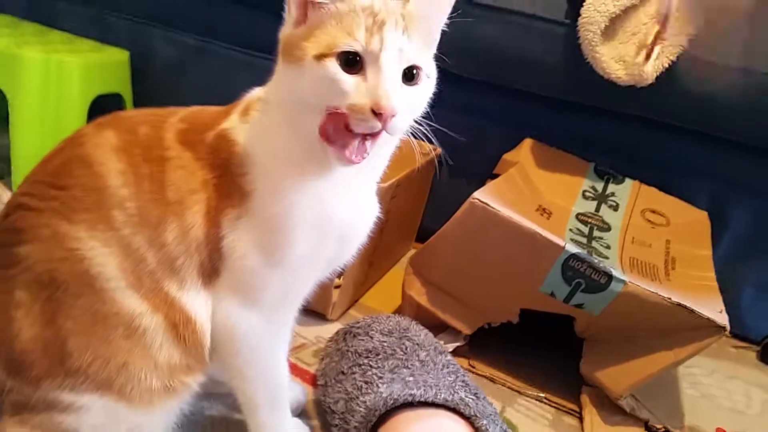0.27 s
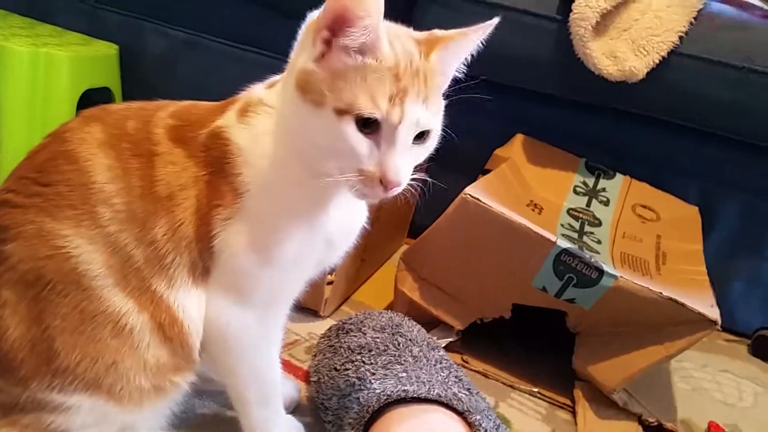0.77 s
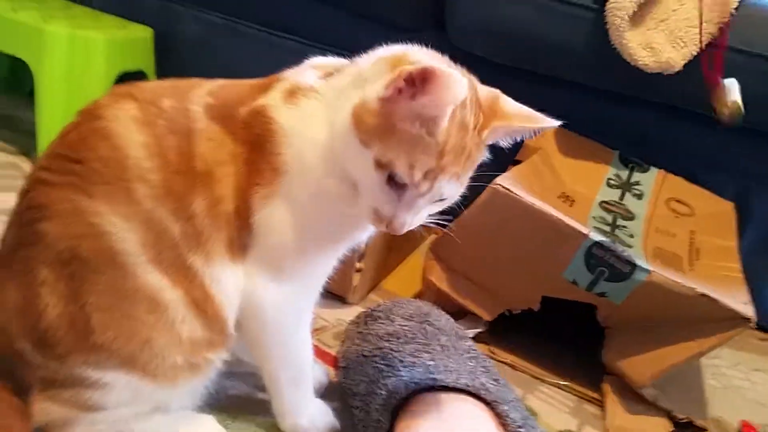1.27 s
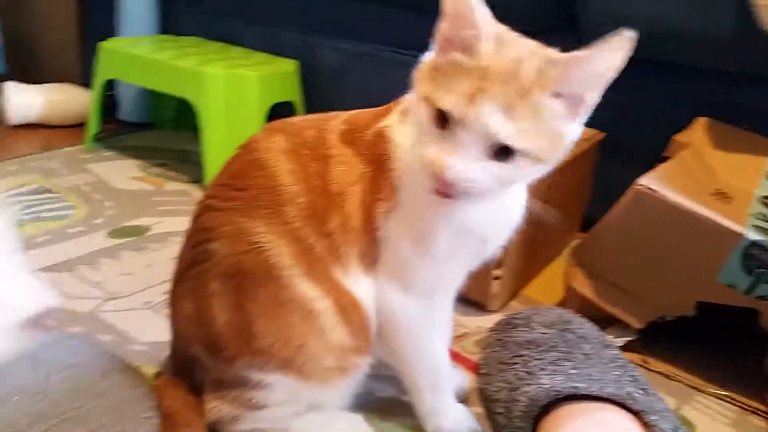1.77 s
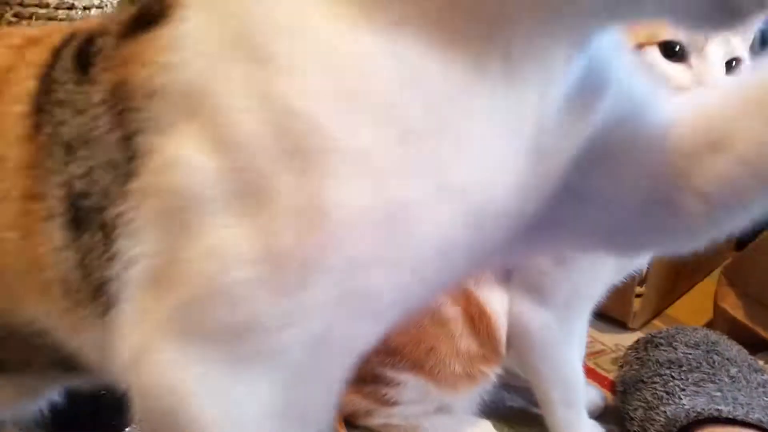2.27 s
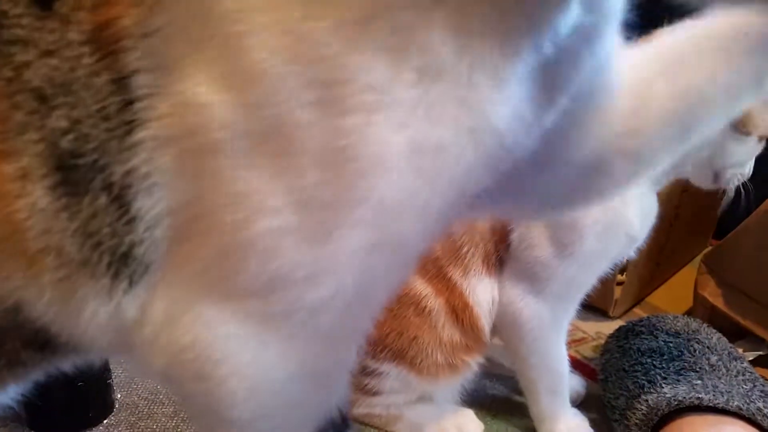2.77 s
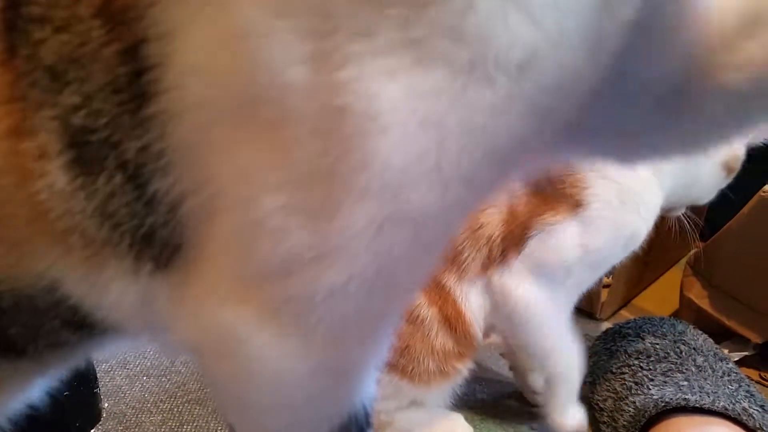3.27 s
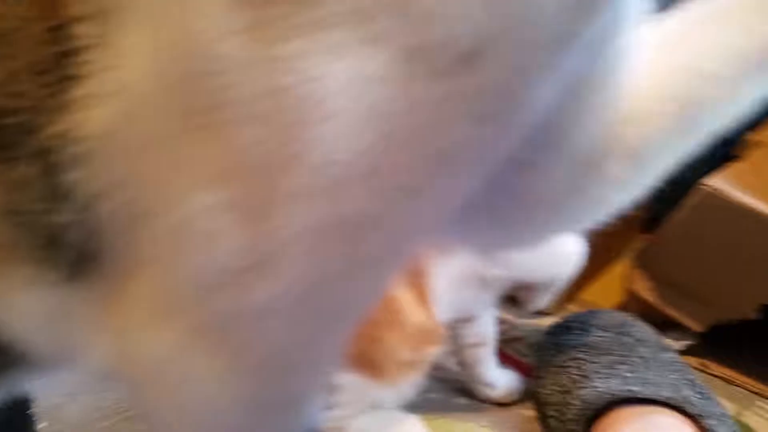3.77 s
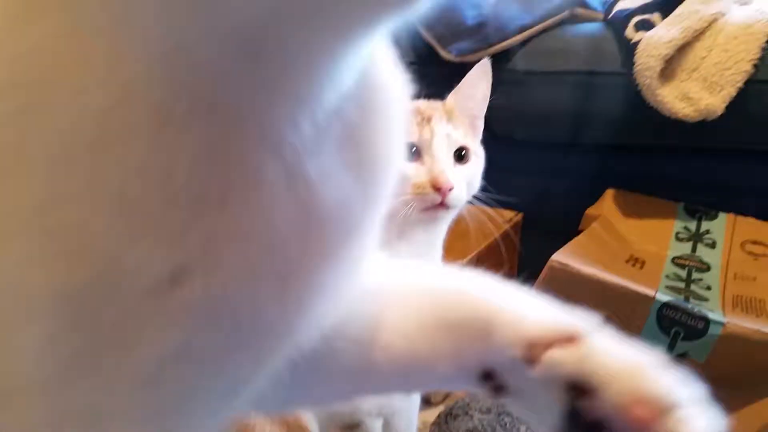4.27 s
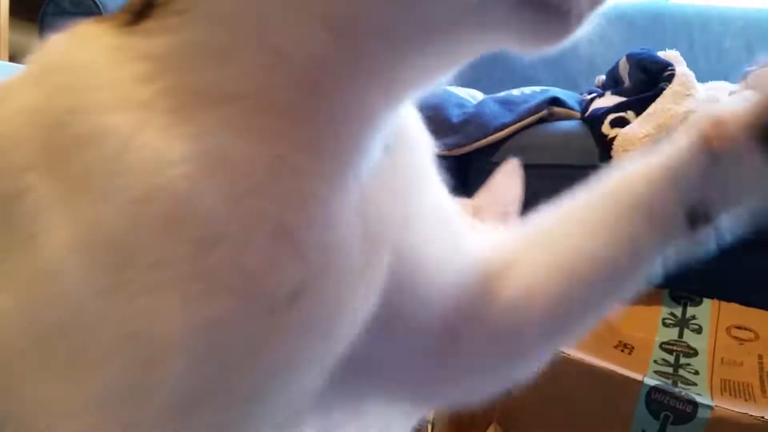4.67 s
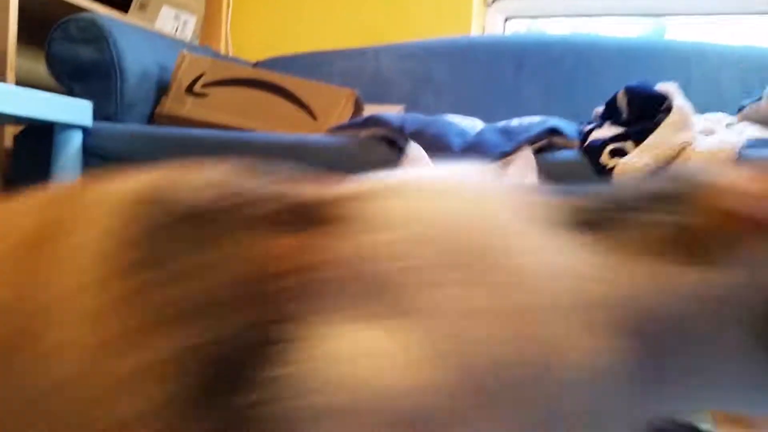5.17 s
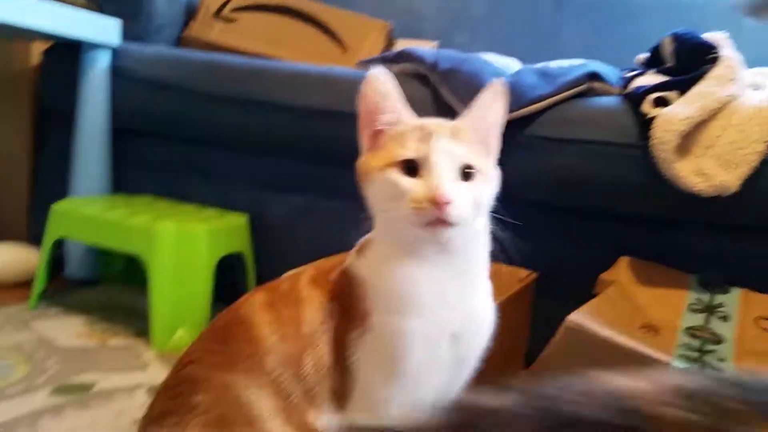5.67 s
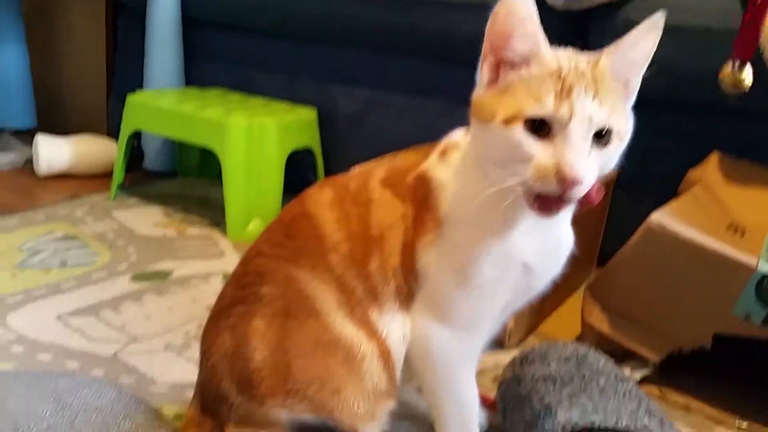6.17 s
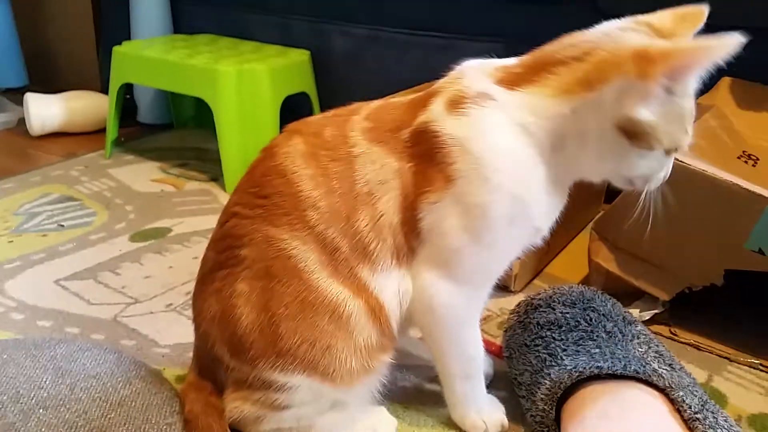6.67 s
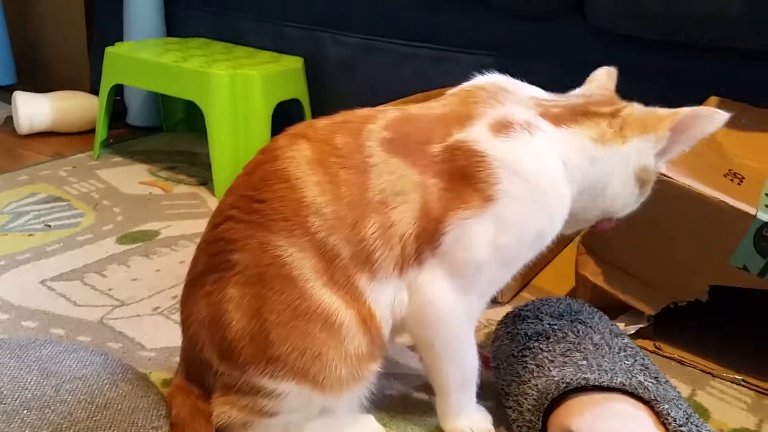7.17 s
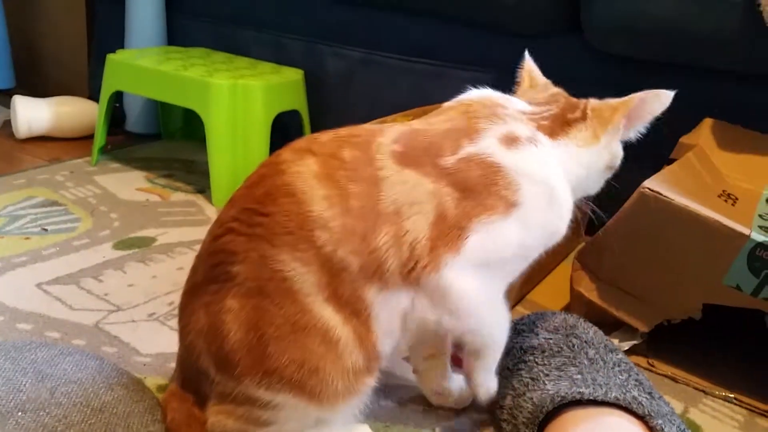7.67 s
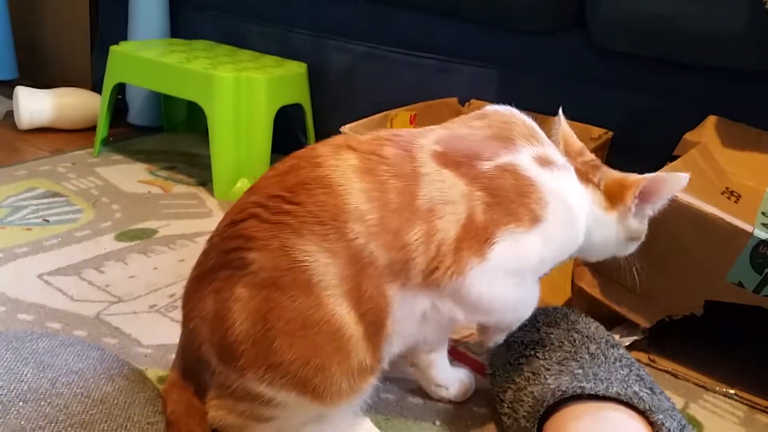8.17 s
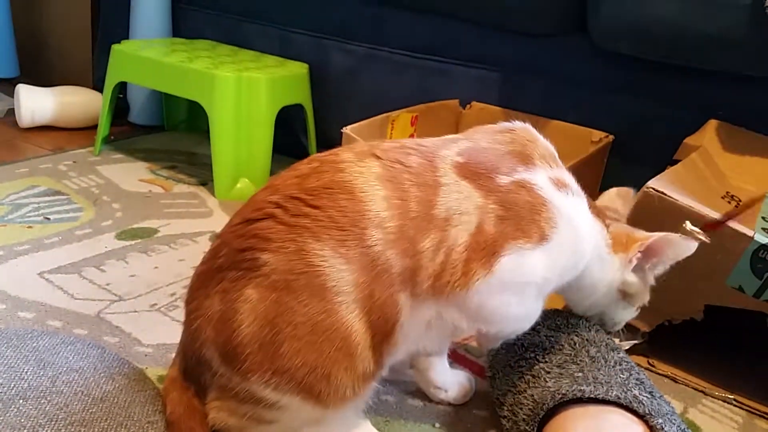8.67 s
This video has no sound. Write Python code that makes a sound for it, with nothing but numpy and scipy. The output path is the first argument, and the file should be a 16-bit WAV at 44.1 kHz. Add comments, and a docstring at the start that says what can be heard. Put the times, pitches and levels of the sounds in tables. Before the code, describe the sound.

Indoors, close to a phone microphone, a little bell tinkles and rattles as cats play with it. Light jingles come first, then a vigorous flurry, a gap with handling bumps and one heavy knock at about five seconds, scattered tinkles, and renewed jingling to the end. The bell sits right; dull finger knocks, rubs and low paw thuds sit left. Quiet background hiss rises and sinks beneath, with a short room echo.

```python
"""A small sleigh bell on a cat toy jingles to the right of a hand-held phone: its loose pellet strikes, stops and
restarts damped shell modes, with noise clicks. The holding hand covers the left microphone, which hears the bell
more faintly but knocks (damped case modes) and rubs (resonant noise patter) loudly. Paws thump as slow pushes
with a rumble, a few dry taps sound on the right, and a quiet background hiss, coloured differently left and
right, swells and sinks."""
import sys
import numpy as np
from scipy import signal
from scipy.fft import rfft, irfft, next_fast_len
from scipy.io import wavfile
from scipy.ndimage import uniform_filter1d, map_coordinates

SR = 44100
rng = np.random.default_rng(int(sys.argv[2]) if len(sys.argv) > 2 else 0)


def master_out(mix):
    """Clip the mix to full scale and print it as 16-bit PCM to the path in sys.argv[1]."""
    frames = np.transpose(np.atleast_2d(mix))
    ceiling = np.clip(frames, -1, 1)
    pcm = np.round(ceiling * 32767).astype(np.int16)
    wavfile.write(sys.argv[1], SR, pcm)


N = 393372  # length in samples


def amp(db):
    """Amplitude factor of a level in dB."""
    return 10 ** (np.asarray(db, float) / 20)


def unit(x):
    """x scaled to an RMS of 1."""
    return x / np.sqrt(np.mean(x ** 2, -1, keepdims=True))


def curve(rows):
    """A level in dB for every sample, -120 dB outside the rows."""
    s, db = np.transpose(rows)
    return np.interp(np.arange(N) / SR, s, db, left=-120, right=-120)


def wobble(rate_hz):
    """A smooth random curve, rate_hz knots a second."""
    knots = rng.standard_normal(int(N * rate_hz / SR) + 4)
    return map_coordinates(knots, [np.arange(N) * rate_hz / SR])


def filtered(x, response):
    """x times a complex response of frequency in Hz."""
    m = next_fast_len(N + SR // 2)
    return irfft(rfft(x, m) * response(np.fft.rfftfreq(m, 1 / SR)), m)[..., :N]


def peaks(rows):
    """Causal response of (Hz, width Hz, dB) resonances, alternating in sign."""
    def response(f):
        return sum((-1) ** k * amp(db) * 1j * f * width / (hz * hz - f * f + 1j * f * width)
                   for k, (hz, width, db) in enumerate(rows))
    return response


def add(track, s, sound):
    """Mixes a sound into the track at s seconds."""
    part = track[..., max(round(s * SR), 0):][..., :sound.shape[-1]]
    part += sound[..., :part.shape[-1]]


# Background swell in the middle band. Each row: time in seconds, level in dB.
SWELL = [(0, 0.5), (.95, -5.5), (1.35, 7), (2.4, 10.5), (2.75, 6.5), (3.2, 6.5), (3.85, 2.5), (4.8, 3),
         (5.3, 11), (5.7, 6.5), (6.1, 8), (6.9, 2), (7.3, 8.5), (7.9, 4), (8.4, 4.5), (8.92, 8)]
# Background colour. Each row: frequency in Hz, left level in dB, right level in dB.
HISS_COLOUR = [(25, -92, -94), (68.8, -87.5, -88), (400, -95.5, -97), (567, -99, -101), (1020, -92.5, -104),
               (1263, -99.5, -108), (1674, -118, -120), (2510, -113, -119), (2740, -127, -126),
               (4275, -102, -115), (4950, -119, -123), (5900, -131, -134), (8500, -134, -137),
               (13060, -122, -126)]


def background():
    """A quiet hiss, coloured differently left and right, swells and sinks; the bass is partly shared."""
    hz, *sides_db = np.transpose(HISS_COLOUR)
    shared, own = rng.standard_normal(N), rng.standard_normal((2, N))

    def colour(f):
        return amp([np.interp(np.log(f + 1), np.log(hz), db) for db in sides_db]) * np.sqrt(SR / 2)

    shared_bass = filtered(shared, lambda f: 0.9 / (1 + (f / 350) ** 2))
    hiss = filtered(own + shared_bass, colour)
    low = filtered(hiss, lambda f: 1 / (1 + (f / 500) ** 4))
    top = filtered(hiss, lambda f: 1 / (1 + (6000 / (f + 1)) ** 8))
    middle = hiss - low - top

    # the middle band swells most
    swell_db = curve(SWELL) + 1.3 * wobble(4.9)
    lumps = amp(2.9 * np.array([wobble(5.9), wobble(14)]))
    return middle * amp(swell_db) + low * lumps * amp(0.42 * swell_db) + top * amp(0.5 * swell_db)


# Fingers shifting on the case. Each row: time in seconds, level in dB.
RUB_LEVEL = [(0, -65), (.9, -62.5), (1.3, -52), (1.92, -47), (2.17, -35.5), (2.55, -70), (3.75, -70.5),
             (4.1, -46), (4.4, -65.5), (4.6, -38.5), (4.78, -81), (4.9, -46), (5.15, -40.5), (5.32, -53),
             (5.5, -43.5), (5.75, -61.5), (6.45, -48.5), (6.8, -60.5)]


def rubbing():
    """Rubbing fingers excite the case with a lumpy noise patter."""
    patter = rng.standard_normal(N) * amp(4.0 * wobble(55) + 2.7 * wobble(20))
    patter = unit(filtered(patter, peaks([(86, 32, -7.5), (311, 72, -5.5), (790, 160, -11)])))
    return amp(curve(RUB_LEVEL)) * patter


GRIP = 0.025  # the grip shifts each case mode by about this share (standard deviation) at every knock


def modes(table, db, t, rise_s):
    """Damped sines of alternate sign, slightly retuned by the grip."""
    ring = 0
    for k, (hz, level_db, t60_s) in enumerate(table):
        level = amp(db + level_db - 60 * t / t60_s)
        ring = ring + (-1) ** k * level * np.sin(2 * np.pi * hz * rng.normal(1, GRIP) * t)
    return ring * (1 - np.exp(-t / rise_s))


# Knocks on the case. Each row: start in seconds, ring level in dB, snap level in dB.
CASE_KNOCKS = [(1.387, -38, -28.5), (1.402, -36, -35), (1.944, -46, -16.5), (1.966, -31, -27.5),
               (1.976, -39, -32), (2.03, -32, -43), (2.167, -35, -30), (2.221, -35.5, -28.5),
               (2.271, -42, -31), (2.387, -47, -38), (4.05, -34, -30), (4.067, -49, -31.5),
               (4.531, -29, -33), (4.578, -33.5, -53), (4.595, -30, -47.5), (4.621, -32, -49.5),
               (4.874, -33, -57), (4.944, -37, -52), (5.059, -34, -36.5), (5.084, -7.5, -12),
               (5.15, -30, -57.5), (5.166, -27.5, -45.5), (5.196, -31, -56), (5.428, -36, -22.5),
               (5.543, -39.5, -36), (5.976, -36.5, -20.5), (6.177, -44, -39), (6.343, -42.5, -38),
               (6.502, -37.5, -43), (6.661, -43, -42), (7.115, -49.5, -46.5), (7.15, -52, -48),
               (7.634, -47, -42.5), (8.351, -53, -45)]
# Low ring of the case. Each row: nominal frequency in Hz, relative level in dB, t60 in seconds.
RING_MODES = [(308, 2, 0.08), (252, -6, 0.15)]
# Modes only a knock's sharp edge wakes. Each row: nominal frequency in Hz, relative level in dB, t60 in seconds.
SNAP_MODES = [(397.7, -4, .04), (1074, 13, 0.012), (549, 3.5, 0.0092)]


def knocks():
    """Each knock wakes short hard modes as a snap and longer low modes as the case's ring."""
    out, t = np.zeros(N), np.arange(SR // 5) / SR
    for s, ring_db, snap_db in CASE_KNOCKS:
        ring = modes(RING_MODES, ring_db, t, rise_s=0.00014)
        snap = modes(SNAP_MODES, snap_db, t, rise_s=0.00023)
        add(out, s, ring + snap)
    return out


def case():
    """Knocks and rubs sound muffled on the left; the right hears that sound, fainter, through two resonances."""
    hump = peaks([(2396, 500, -32)])  # a resonance near 2.4 kHz colours the knocks on the left

    def hand(hz):
        flesh = 1 / (1 + 1j * hz / 1500) ** 4 / (1 + (hz / 1400) ** 7)
        return flesh + hump(hz)

    left = filtered(knocks() + rubbing(), hand)
    right = filtered(left, peaks([(342, 540, -20.5), (1076, 550, -20.0)]))
    return np.array([left, right])


# Pellet strikes at the right microphone, before the shell's radiation filter.
# Each row: start in seconds, click level in dB, low ring level in dB, upper ring level in dB.
PELLET_STRIKES = [(0.062, -52, -54, -77), (0.1011, -25.5, -39, -44), (0.1238, -39, -34, -40),
                  (0.1384, -25, -34, -43), (0.1845, -22.5, -26.5, -49), (0.2141, -27, -23.5, -37),
                  (0.2308, -20, -31, -36), (0.2761, -16, -27, -39), (0.2843, -34, -54, -56),
                  (0.325, -38, -40, -58), (0.3397, -33, -47, -59), (0.377, -37.5, -52, -66),
                  (0.4543, -36, -37.5, -43.5), (0.479, -37.5, -44.5, -48), (0.5285, -36.5, -45.5, -65),
                  (0.6698, -52, -47, -55), (0.7023, -28, -28, -43), (0.7666, -31.5, -34.5, -48.5),
                  (0.856, -47.5, -60, -75), (0.968, -52, -50.5, -68), (1.1707, -44, -43, -56.5),
                  (1.2277, -18, -23, -32), (1.3752, -38.5, -50, -68), (1.4265, -35, -43, -53),
                  (1.4822, -37.5, -49, -67), (1.7408, -38, -57, -51), (1.752, -36, -46, -43),
                  (1.7724, -14, -28, -31.5), (1.8114, -24, -31, -37.5), (1.9341, -31, -32, -34),
                  (1.9735, -17, -22, -27), (1.9894, -21.5, -32, -37), (2.062, -27, -37.5, -47),
                  (2.2364, -40, -40, -62), (2.2645, -12.5, -20, -27.5), (2.2874, -32, -33, -32),
                  (2.3022, -15.5, -28, -34), (2.3847, -16, -33, -39), (2.401, -29, -28, -36),
                  (2.4196, -7.5, -16.5, -25), (2.4278, -16.5, -26, -30), (2.5149, -30.5, -42, -53),
                  (2.576, -27, -40, -50), (2.5858, -22.5, -28, -36.5), (2.6017, -30.5, -40, -44),
                  (2.7021, -29.5, -82, -73), (2.7252, -33, -40, -58), (2.8321, -21, -44, -36),
                  (2.8589, -26.5, -34, -30), (2.9, -7.5, -23.5, -29), (2.9104, -17, -21, -28),
                  (2.9466, -34, -24.5, -37), (2.9658, -29, -36, -40), (2.9724, -13, -18, -38),
                  (2.9859, -12, -18.5, -26), (2.997, -30, -42, -45), (3.0109, -26, -27, -37.5),
                  (3.0254, -8.5, -19, -19.5), (3.0441, -31, -27.5, -41.5), (3.066, -13, -20.5, -28.5),
                  (3.0808, -11, -22, -42), (3.088, -17, -29, -41), (3.0963, -33, -30, -39.5),
                  (3.1992, -36.5, -41.5, -61), (3.2233, -36.5, -60, -72), (3.2448, -33, -45, -66),
                  (3.3113, -21, -36.5, -42), (3.3428, -8, -12.5, -35), (3.3537, -8, -38, -30),
                  (3.364, -15.5, -34, -39), (3.4077, -35.5, -42.5, -60), (3.5339, -41, -36, -38.5),
                  (3.569, -11.5, -26, -29.5), (3.6067, -18.5, -27, -40), (3.6316, -30, -34.5, -45),
                  (4.9563, -35, -32, -38), (5.0103, -30.5, -42.5, -48), (5.055, -40, -58, -62.5),
                  (5.1877, -24.5, -35, -43), (5.2183, -33, -40, -41), (5.2421, -21, -42, -45),
                  (5.2712, -26.5, -42, -48), (5.287, -51, -62, -66), (5.313, -44, -62, -70),
                  (5.3313, -36.5, -41.5, -58), (5.3961, -44.5, -53, -75.5), (5.828, -54, -51, -65),
                  (5.8574, -26, -23.5, -45), (5.8874, -27, -35.5, -36), (5.905, -26.5, -36, -44),
                  (6.078, -49, -55, -68), (6.095, -52, -61, -70), (6.129, -41, -46, -65),
                  (6.1648, -35.5, -38, -56), (7.0168, -53, -64, -44), (7.0536, -42, -42, -37.5),
                  (7.0638, -21, -28.5, -32), (7.088, -21, -33, -37), (7.102, -27, -39, -45),
                  (7.1916, -23.5, -31.5, -38), (7.2656, -15.5, -23, -34), (7.276, -14.5, -21.5, -27),
                  (7.2998, -23.5, -40.5, -44), (7.3914, -36, -59, -62), (7.4636, -36, -46, -50),
                  (7.493, -38, -40, -39.5), (7.5367, -44, -41, -55), (7.546, -35, -28.5, -39),
                  (7.5879, -18.5, -21, -27), (7.5972, -18, -26, -23), (7.6051, -18, -20.5, -27),
                  (7.6214, -16.5, -21.5, -31), (7.7043, -29.5, -43.5, -53), (7.8977, -42.5, -65, -69),
                  (8.0095, -29, -29.5, -39.5), (8.0599, -36, -41, -40), (8.1049, -36, -27, -39),
                  (8.1178, -11.5, -25.5, -32), (8.14, -22.5, -34, -38), (8.1965, -44, -50, -44),
                  (8.208, -28, -34, -40), (8.258, -23.5, -32, -39), (8.273, -31, -43, -53),
                  (8.3656, -29, -43, -55), (8.459, -31, -48, -53), (8.5446, -20.5, -35, -42),
                  (8.5637, -21, -29.5, -38), (8.5859, -13.5, -22, -28.5), (8.6647, -31, -33.5, -34),
                  (8.6885, -18, -30, -40), (8.7015, -22, -35, -39), (8.744, -29, -39, -52),
                  (8.7712, -20.5, -34.5, -36), (8.787, -28, -31, -35), (8.8139, -30, -33.5, -40),
                  (8.8649, -10.5, -20, -21), (8.875, -14.5, -22.5, -32)]


def touches():
    """The pellet's life per sample: row of the latest strike, seconds since it, and its random small bounces."""
    rows, n = np.array(PELLET_STRIKES), np.arange(N)
    starts = np.round(rows[:, 0] * SR)
    last = np.clip(np.searchsorted(starts, n, side="right") - 1, 0, None)
    t = np.where(n < starts[0], N, n - starts[last]) / SR  # long decayed before the first strike
    bounce = rng.random(N) < 300 / SR * np.exp(-t / 0.15)  # 300 a second, thinning out
    return rows, last, t, bounce


# As the bell turns, the middle or the high mode faces the microphone.
# Each row: time in seconds, middle over high mode in dB.
BELL_FACING = [(.1, -1), (.6, 6), (1.23, -20), (1.75, 1), (1.98, -2), (2.4, -7.5), (3.0, -13), (3.35, -8.5),
               (3.57, 4), (4.96, -7), (5.2, -2.5), (5.87, 4.5), (7.07, 0), (7.27, 2), (7.6, -7), (8.1, 0.5),
               (8.6, -7), (8.8, 3)]
SPOT_DB = 6.5  # scatter of that balance with the spot that the pellet hits
FAINT_DB = -25.5  # faint mode just above the low one, relative to it


def mode_levels(rows):
    """Level in dB of each mode for every strike: two modes share the upper ring's power."""
    low_db, upper_db = rows[:, 2], rows[:, 3]
    facing_db = np.interp(rows[:, 0], *np.transpose(BELL_FACING))
    balance_db = facing_db + SPOT_DB * rng.standard_normal(len(rows))
    share = 1 / (1 + amp(-2 * balance_db))
    middle_db = upper_db + 10 * np.log10(share)
    high_db = upper_db + 10 * np.log10(1 - share)
    return low_db, middle_db, high_db, low_db + FAINT_DB


# Shell modes: low, middle, high, faint. Each entry: nominal frequency in Hz.
MODE_HZ = [5435, 12515, 13870, 6250]
# The same modes. Each row: t60 in seconds without bounces, mean left minus right level in dB.
MODE_DECAY = [(0.39, -22.5), (0.17, -4.5), (0.18, -11), (.2, -12)]


def shell(rows, last, t, bounce):
    """Each strike stops the old ring and starts a new one; each bounce steals some ring and jolts its phase."""
    out = np.zeros((2, N))
    for hz, (t60_s, left_db), db in zip(MODE_HZ, MODE_DECAY, mode_levels(rows)):
        detune, scatter, left_phase = rng.standard_normal((len(rows), 3)).T
        steal_db, kick_rad = rng.exponential(1.4, N), rng.normal(0, 1.2, N)
        loss_db, jolt_rad = np.cumsum(bounce * [steal_db, kick_rad], axis=1)
        loss_db = loss_db - np.maximum.accumulate(loss_db * (t == 0))  # restarts at each strike

        level_db = db[last] - 60 * t / t60_s - loss_db + 3 * wobble(100)
        level = uniform_filter1d(amp(level_db), size=17)
        phase = 2 * np.pi * hz * (1 + 0.0012 * detune[last]) * t + uniform_filter1d(jolt_rad, size=50)

        # each mode's left level varies randomly from strike to strike and wavers
        offset_db = left_db + 3.4 * scatter[last] + 1.9 * wobble(57)
        out[0] += level * amp(offset_db) * np.sin(phase + 2 * left_phase[last])
        out[1] += level * np.sin(phase)
    return out


# Click colour: one list for the left microphone, one for the right.
# Each row: frequency in Hz, width in Hz, level in dB.
CLICK_COLOUR = [
    [(6070, 1500, -24), (8900, 260, -17), (15600, 140, -21)],
    [(5580, 560, -7), (7970, 1034, 1.5), (16140, 400, -12.5)],
]


def pellet(rows, last, t, bounce):
    """A hard click at each strike, duller small ones at the bounces, and a scrape as the pellet rolls to rest."""
    click_db = rows[last, 1]
    blow = amp(click_db + 2.5 - 60 * t / 0.004) * rng.standard_normal(N)

    size_db = 5 * np.minimum(rng.exponential(1, N), 3)
    bounces = bounce * amp(click_db - 15 - 60 * t / 0.31 + size_db)
    bounce_decay = amp(-60 * np.arange(SR // 50) / SR / 0.0057)
    bounces = signal.fftconvolve(bounces, bounce_decay)[:N]
    roll = amp(click_db - 16.5 - 60 * t / 0.14 + 3.5 * wobble(150))
    small = filtered((bounces + roll) * rng.standard_normal(N), lambda hz: 1 / (1 + (hz / 11000) ** 4))
    return np.array([filtered(blow + small, peaks(side)) for side in CLICK_COLOUR])


# Decay of the room. Each row: frequency in Hz, t60 in seconds.
ROOM_DECAY = [(6000, 0.15), (14000, 0.12)]


def room(x):
    """Noise tails, independent in the two microphones, in which each frequency dies at its own speed."""
    hz, t, z = signal.stft(rng.standard_normal((2, SR // 2)), SR, nperseg=256)
    t60_s = np.interp(hz, *np.transpose(ROOM_DECAY))[:, None]
    tail = signal.istft(z * amp(-60 * t / t60_s), SR, nperseg=256)[1]
    tail = tail / np.linalg.norm(tail[0])
    delayed = np.pad(x, (200, 0))[None]  # samples
    return signal.fftconvolve(delayed, tail, axes=1)[:, :N]


def bell():
    """Shell ring and pellet clicks share one life, the shell's radiation and the room's echo."""
    life = touches()

    def radiation(hz):
        # so small a shell radiates little below its lowest mode
        return (1j * hz / (3200 + 1j * hz)) ** 6 * 2.2 / (1 + (5000 / (hz + 1)) ** 16)

    def covered(hz):
        # the hand over the left microphone muffles the room below the top treble
        return amp([5 - 16 / (1 + (hz / 8200) ** 6), 0 * hz])

    ring, clicks = filtered(shell(*life), radiation), filtered(pellet(*life), radiation)
    echo = room(amp(-13.5) * ring[1] + amp(-16.5) * clicks[1])
    return ring + clicks + filtered(echo, covered)


# Paws landing. Each row: start in seconds, left level in dB, right level in dB.
PAW_THUMPS = [(0.232, -47, -49), (1.395, -37.5, -58), (1.444, -33.5, -47), (1.582, -55, -49),
              (1.784, -37, -42.5), (2.028, -21.5, -41), (2.099, -57, -44), (2.468, -35, -37),
              (2.702, -54.5, -43), (3.872, -25.5, -52.5), (5.085, -27, -37.5), (5.433, -41.5, -31),
              (5.471, -42, -37.5), (5.59, -44.5, -41.5)]


def paws():
    """One slow push for each thump, deeper when it is soft, with a short rumble."""
    out, t = np.zeros((2, N)), np.arange(SR // 5) / SR
    for s, left_db, right_db in PAW_THUMPS:
        hz = 205.5 + 1.9 * max(left_db, right_db)
        push = np.cos(2 * np.pi * hz * (t - 0.007)) * np.exp(-((t - 0.007) / 0.0031) ** 2)
        rumble = rng.standard_normal((2, len(t)))
        rumble = unit(uniform_filter1d(uniform_filter1d(rumble, size=150), size=150))
        rumble = 0.54 * rumble * amp(-60 * t / 0.11) * (1 - np.exp(-t / 0.0027))
        add(out, s, amp([[left_db], [right_db]]) * (rumble - push))
    return out


# Dry taps of the bell against something hard. Each row: start in seconds, relative level in dB.
DRY_TAPS = [(2.7017, -48.5), (3.297, -46), (3.5696, -39)]


def taps():
    """Each tap is a single short pressure pulse at the right microphone."""
    out, t = np.zeros((2, N)), np.arange(SR // 5) / SR
    for s, db in DRY_TAPS:
        add(out[1], s, amp(db + 10.5) * (t / 0.00023) * np.exp(1 - t / 0.000089))
    return out


def scene():
    """Sums all layers, left and right."""
    return background() + case() + bell() + paws() + taps()


TOP_HZ = 15750


def record(dry):
    """The phone's band limit: a steep low-pass."""
    return filtered(dry, lambda hz: 1 / (1 + (hz / TOP_HZ) ** 120))


dry = scene()
out = record(dry)
master_out(out)
```